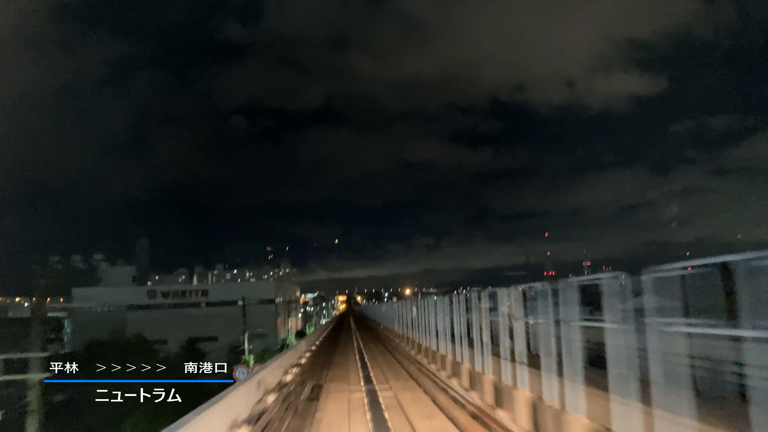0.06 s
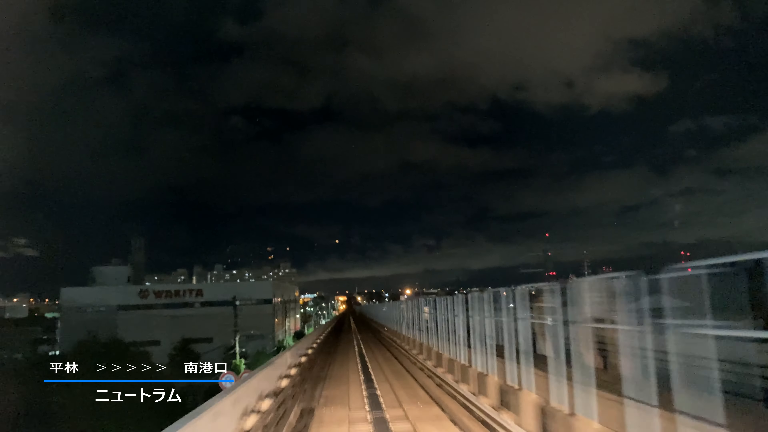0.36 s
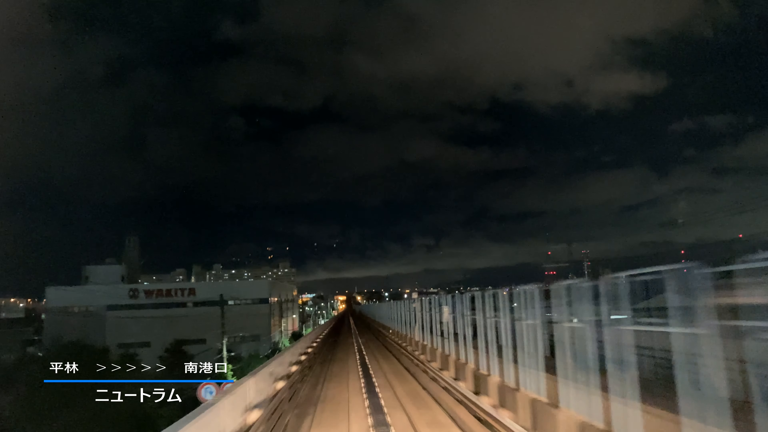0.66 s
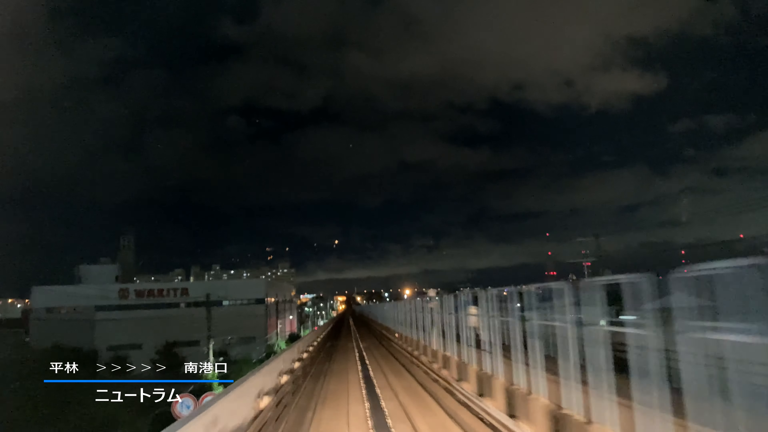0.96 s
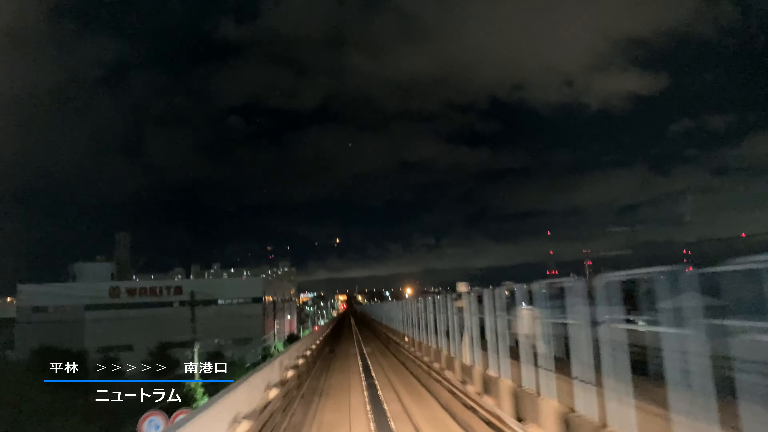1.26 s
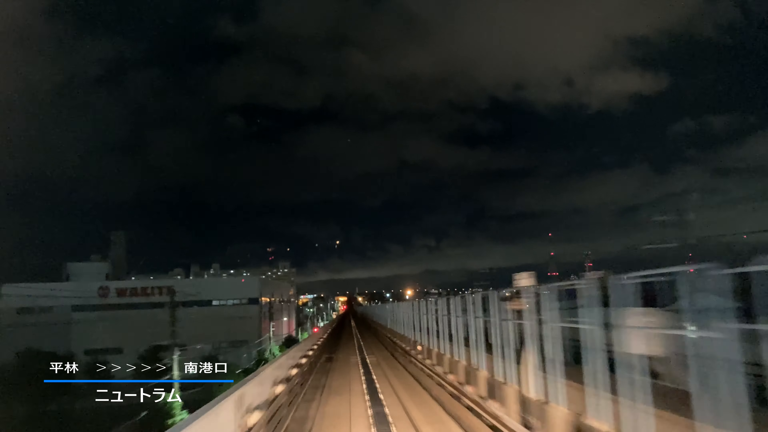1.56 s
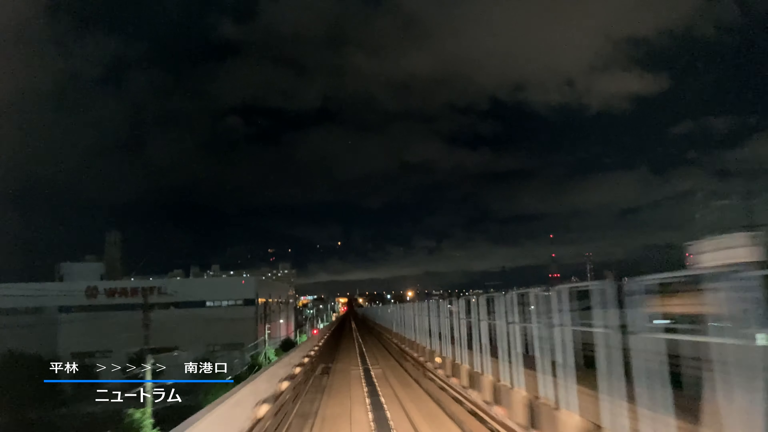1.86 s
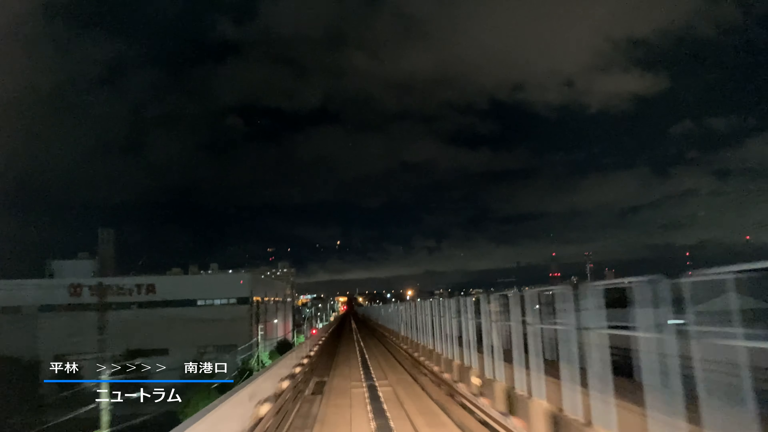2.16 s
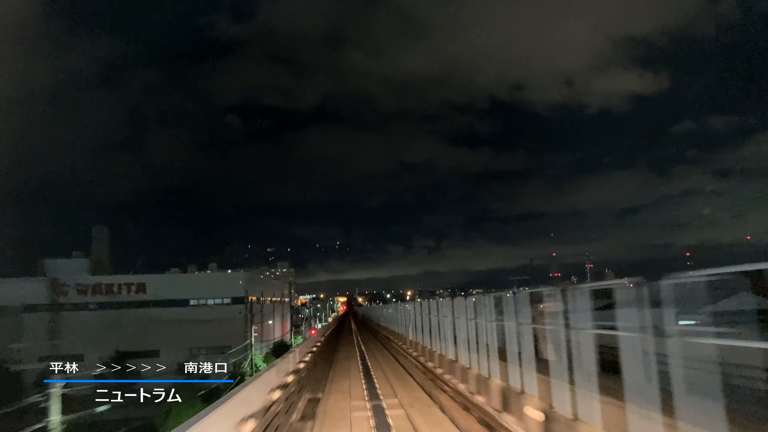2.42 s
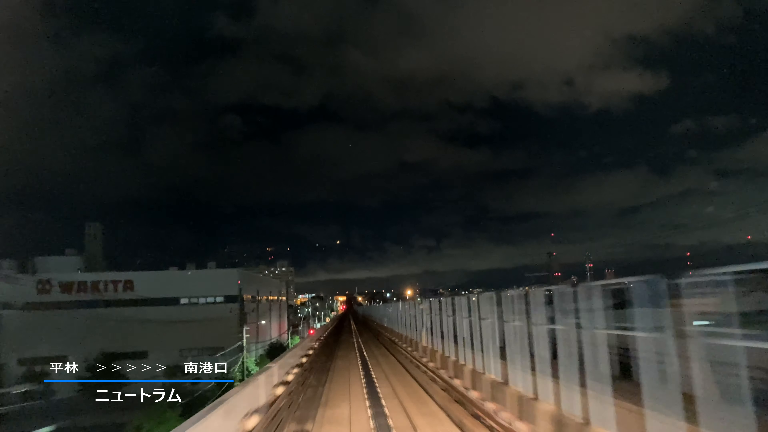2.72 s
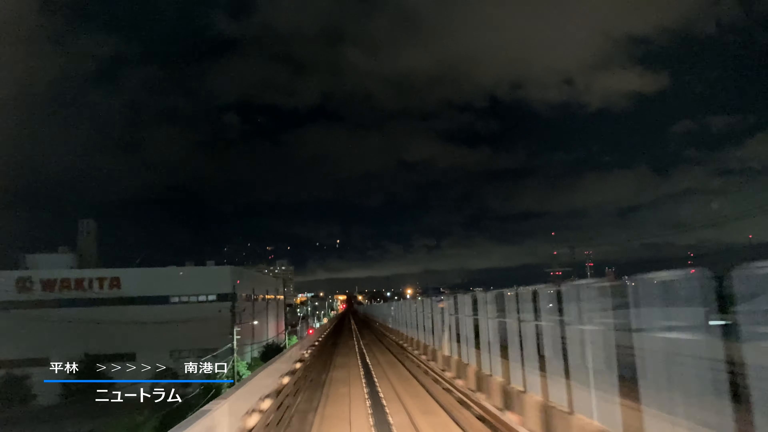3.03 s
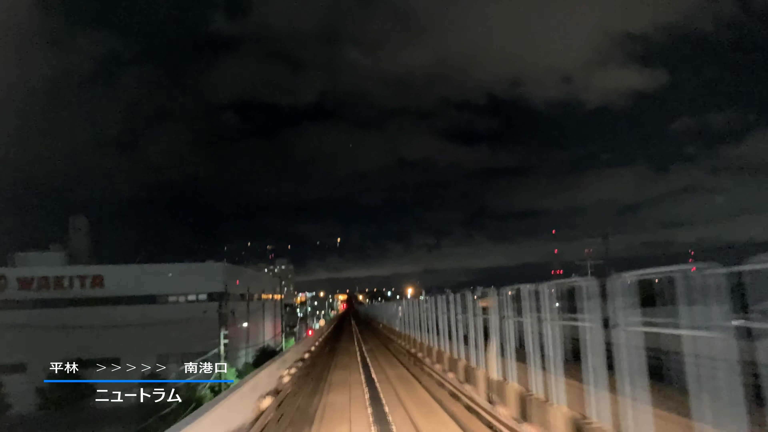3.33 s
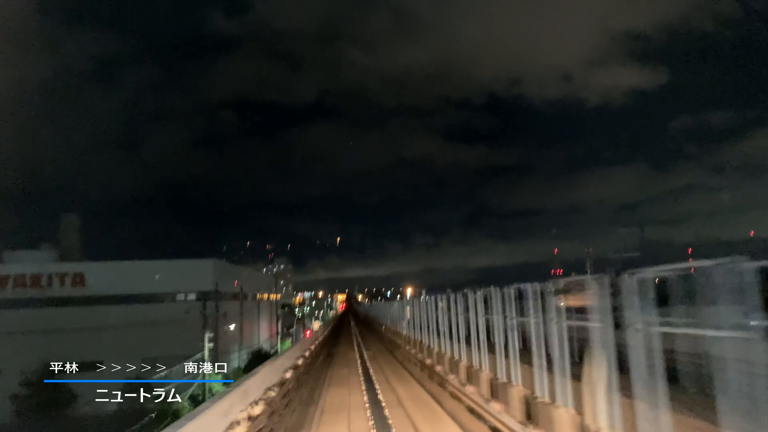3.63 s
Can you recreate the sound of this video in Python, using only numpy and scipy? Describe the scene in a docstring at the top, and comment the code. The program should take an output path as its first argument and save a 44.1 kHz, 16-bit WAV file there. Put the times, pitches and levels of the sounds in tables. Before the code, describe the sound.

A tram rumbles along an elevated track, heard from inside, with soft thuds over joints, rushing air, brief scraping and ticking fittings.

```python
"""A rubber-tyred tram runs along a raised concrete track, heard from inside the front of the car.
The tyres shake the body, set the cabin air booming, roar on the concrete and thud over joints.
The drive hums thinly, air rushes past, and the shoes that collect power rub on their rail in spells.
Loose fittings rattle and tick as the car is jolted, and now and then there is a faint, high squeak."""
import sys
import numpy as np
from scipy import signal
from scipy.fft import rfft, irfft, next_fast_len
from scipy.io import wavfile
from scipy.ndimage import uniform_filter1d

SR = 44100
rng = np.random.default_rng(int(sys.argv[2]) if len(sys.argv) > 2 else 0)


def to_wav(sig):
    """Store sig (one row per channel, or 1-D mono) as 16-bit WAV at the path in sys.argv[1].

    Samples outside -1..1 are clipped; the rate is SR.
    """
    pcm = np.clip(np.atleast_2d(sig), -1, 1) * 32767
    pcm = np.round(pcm).astype(np.int16)
    wavfile.write(sys.argv[1], SR, pcm.T)  # frames by channels


N = 351477
FFT_SIZE = next_fast_len(N, real=True)
HZ = np.maximum(np.arange(FFT_SIZE // 2 + 1) * SR / FFT_SIZE, 1)  # the frequencies in a spectrum

# How rough the track is. Each row: time in seconds, roughness in dB above ordinary concrete.
ROUGHNESS = [(0, 8), (.5, 1.5), (.65, 2), (1.1, 2), (1.35, 3.5), (1.7, 4), (1.9, -0.5), (2.1, -1),
             (2.7, -1.5), (3.4, -2.5), (3.57, 3.5), (3.98, 1.5), (4.3, 1.5), (4.9, -2), (5.55, -0.5),
             (5.8, 2.5), (6.8, -1.5), (7.55, 0), (7.85, 4)]
# How sounds follow it. Each pair: level in dB on ordinary concrete, dB added per dB of roughness.
BOOM_LAW, BODY_LAW, SWAY_LAW, ROAR_LAW = (-22.5, 1.0), (-20, 0.69), (-21.5, 0.14), (-24.5, 0.25)
SCRAPE_LAW, SIZZLE_LAW, RATTLE_LAW = (-50, 0.8), (-62, 1.8), (-59, 0.93)

# Uneven patches: long waves in the concrete make the air boom, short ones shake the body.
# Each row: start in seconds, length in seconds, boom in dB, body shake in dB.
BUMPS = [(0.0, 0.046, -9, -15), (0.145, 0.21, -11.5, -29), (.46, .07, -20.5, -21),
         (0.723, 0.13, -11.5, -35), (0.964, 0.071, -29, -15.5), (1.047, 0.15, -12.5, -53),
         (1.267, 0.052, -31, -13.5), (1.347, 0.19, -11, -39), (1.579, .05, -17.5, -17),
         (2.725, 0.17, -23, -40), (3.088, .2, -24, -45), (3.45, 0.15, -10.5, -35), (3.554, 0.088, -18, -13),
         (3.69, 0.08, -13.5, -21), (3.8, .05, -31.5, -15), (3.88, 0.11, -13, -22),
         (4.052, 0.045, -15.5, -25), (4.193, .16, -23.5, -25), (4.604, 0.2, -15, -47),
         (5.018, 0.15, -30.5, -17.5), (5.258, 0.28, -18, -29), (5.574, 0.13, -13, -25),
         (5.733, 0.22, -12, -20), (6.11, .2, -15.5, -24), (6.362, 0.035, -23, -13),
         (6.695, 0.11, -37, -17.5), (6.941, 0.31, -20, -22.5), (7.162, 0.045, -22.5, -15.5),
         (7.66, .04, -12, -28), (7.797, 0.11, -15.5, -22)]
# The car lurches on its springs. Each row: start in seconds, level in dB.
LURCHES = [(.1, -20), (1.86, -18.5), (3.29, -16), (3.65, -15), (3.95, -16.5), (6.21, -20.5)]
# How loud the drive hums. Each row: time in seconds, level in dB.
HUM_LEVEL = [(0, -42.5), (.4, -38.5), (1.7, -40.5), (2.6, -52), (3.3, -52.5), (3.5, -37.5), (4, -52.5),
             (5.2, -40.5), (6.3, -47), (7, -39.5), (7.97, -38.5)]
# The tones in that hum. Each row: pitch in Hz, dB added to the hum's level.
HUM_TONES = [(452, 2), (1143, -21.5)]
# A shoe presses on the rail. Each row: start and length in seconds, scrape and sizzle in relative dB.
RUBS = [(0.0, 0.26, -48, -56), (0.305, 0.23, -51.5, -52), (0.94, 0.06, -40.5, -46),
        (1.198, 0.034, -49, -46), (1.298, 0.042, -39.5, -45), (1.424, 0.14, -46, -62),
        (3.517, .07, -49, -60), (3.584, 0.11, -37.5, -45.5), (3.69, 0.1, -42.5, -45.5),
        (3.9, 0.043, -37.5, -45), (3.935, 0.1, -43.5, -44.5), (4.115, 0.026, -42, -38),
        (4.224, 0.18, -52, -55.5), (4.8, 0.076, -43, -60), (5.252, 0.13, -42.5, -69), (6.18, .08, -51, -54),
        (7.684, 0.16, -43, -68)]
# Loose fittings tick. Each row: start in seconds, ring in relative dB, crack in dB.
TICKS = [(0.0971, -42, -39), (0.2408, -37.5, -41), (0.248, -38, -41), (0.36, -42, -49), (0.966, -52, -40),
         (1.2859, -40, -48), (1.4835, -32.5, -38), (1.4984, -40, -47), (1.7776, -37.5, -46),
         (2.9232, -40, -49), (3.1166, -49, -52), (3.3492, -39, -50), (3.4599, -36, -45), (3.6117, -40, -44),
         (3.652, -37, -41), (3.659, -34, -38), (3.693, -39, -42), (3.9025, -44, -46), (3.917, -28.5, -37.5),
         (3.944, -42, -42), (4.028, -34, -44), (4.13, -42, -39), (5.663, -38, -43), (5.696, -41, -44),
         (7.209, -36.5, -43), (7.658, -37, -44), (7.728, -43, -48), (7.7413, -31, -37), (7.749, -40, -46),
         (7.7688, -42, -48), (7.926, -33, -39)]
# The tyres cross joints in the track. Each row: start in seconds, thud in dB, knock in dB.
JOINTS = [(0.292, -47, -28.5), (1.26, -26, -27), (1.329, -26, -23), (1.397, -33, -25), (1.659, -24.5, -29),
          (2.04, -27, -38), (2.83, -41, -28), (3.219, -24.5, -22), (3.552, -22.5, -21), (3.677, -22.5, -34),
          (3.79, -33, -27), (3.915, -23, -23), (4.131, -21, -33), (4.42, -27, -29), (4.475, -25.5, -33),
          (5.07, -40, -36.5), (5.64, -27.5, -42), (5.698, -25.5, -30.5), (5.78, -22, -43),
          (5.849, -31.5, -28.5), (5.999, -23.5, -39), (6.121, -24, -27.5), (6.4, -26, -30),
          (6.584, -26.5, -25.5), (7.829, -22, -32)]
# Faint, high squeaks. Each row: start in seconds, pitch in Hz, level in dB.
SQUEAKS = [(0.70, 7600, -63), (5.83, 7300, -63), (5.905, 7630, -62), (6.09, 7800, -61), (6.165, 7700, -62),
           (6.355, 7700, -64), (6.93, 8200, -61), (6.98, 8200, -51), (7.09, 7700, -56), (7.565, 8200, -56),
           (7.875, 7750, -63)]

# A colour says how strong a noise is from low to high. Each row: frequency in Hz, relative level in dB.
BODY_COLOUR = [(66, -6), (92, 3), (115, -0.5), (150, -4.5), (166, -8.5), (182, -17.5), (212, -13.5),
               (245, -19), (330, -27.5)]  # the shaking body
SWAY_COLOUR = [(15, -32), (28, -16), (35, -2.5), (39, -7), (45, 4), (53, -3), (62, 1), (70, 9), (78, 3),
               (86, -26.5)]  # the rocking car
ROAR_COLOUR = [(140, -1.5), (165, 3.5), (182, -2), (207, 6), (235, 0), (265, 0.5), (370, -4), (500, -7),
               (720, -5.5), (950, -11), (1100, -8.5), (1200, -14), (1400, -14), (1650, -19), (2300, -62.5),
               (4000, -66.5)]  # tread on concrete
AIR_COLOUR = [(1100, -19), (1700, -3.5), (2100, 3), (2500, -10.5), (3300, -7), (3750, -10.5), (4200, -15),
              (5000, -14), (6000, -23), (7500, -25), (9800, -26.5), (12000, -35.5), (15500, -43.5)]  # rushing air
SCRAPE_COLOUR = [(900, -17.5), (1600, 7.5), (2200, 1.5), (3000, -5.5), (3750, -7), (4500, -14.5),
                 (6000, -18.5), (9000, -40)]  # a shoe's dull scrape
SIZZLE_COLOUR = [(2500, -20.5), (4400, 7.5), (6000, 0.5), (7700, -1), (9800, -2), (11500, -8.5),
                 (15500, -17.5)]  # a shoe's fine sizzle
RATTLE_COLOUR = [(2500, -2), (4500, 4), (6000, -6), (7800, -3.5), (11500, -13.5), (15500, -22.5)]  # small loose parts
CRACK_COLOUR = [(1400, -1), (2700, 4.5), (3800, 0.5), (4750, 1.5), (6200, -3), (7800, -4.5), (11500, -11),
                (15500, -22)]  # a plastic fitting's crack
THUD_COLOUR = [(230, -4.5), (290, 1.5), (340, 0.5), (365, -12.5), (410, -3.5), (500, -10.5)]  # the floor at a joint
KNOCK_COLOUR = [(450, -12), (570, 1), (740, -4.5), (850, -6.5), (1050, -6), (1200, -12), (1500, -16.5)]  # the walls at a joint

# Modes are where a part likes to ring. Each row: frequency in Hz, width in Hz, boost or cut in dB.
BODY_MODES = [(128.4, 5.6, 2.5), (139, 6.4, 3), (199, 30, 4.5)]  # the car body
PANEL_MODES = [(325, 17, 2.5), (374, 10, 2.5), (413.5, 33, 4.5), (539, 16, 6.5), (577, 9, 5.5),
               (744, 8, -8), (800, 12, 2), (832, 39, 5), (923.4, 30, 8), (960, 12, 8), (991, 12, 1.5),
               (1031, 8.4, 6)]  # floor and wall panels
TRIM_MODES = [(2385, 22, 9.5), (2660, 27, 6.5), (2820, 35, 2), (2930, 16, 12.5), (3150, 14, 5.5),
              (3350, 18, 7), (4150, 200, 8), (6470, 350, 7.5), (7650, 500, 1), (10800, 2700, 9)]  # cabin trim in the rushing air
FITTING_MODES = [(2900, 430, -3.5), (3500, 300, -3), (4280, 290, -4.5), (4720, 380, -4.5), (5300, 300, -16)]  # loose fittings
KNOCK_MODES = [(575, 57, 7.5), (670, 55, 7), (826, 35, 6)]  # knocked walls

# The microphone's left and right openings, or ports. Each row: frequency in Hz, how alike they sound
# from 0 to 1, how far the left is ahead in radians, how much louder the left is in dB.
PORTS = [(80, .999, .42, -1), (130, .996, .36, -.7), (220, .98, .15, 0), (290, .96, .35, 0),
         (430, .91, -.1, 1), (590, .74, 1, 0), (740, .52, .9, -.5), (1000, .72, .65, -.5),
         (1380, .5, .6, -1.5), (1580, .66, 3.95, -.5), (2050, .85, 3.75, -3), (2350, .55, 3.6, -3),
         (2600, .65, 7.05, -1.5), (3350, .55, 7.1, -1.5), (3950, .42, 10.1, 1), (4800, .35, 13.2, .5),
         (6000, .2, 15.4, -.5), (7200, .45, 18.4, -1), (11500, .7, 31, 0), (15500, .6, 38, 0)]
# Dips in the microphone's treble. Each row: frequency in Hz, width in Hz, level change in dB.
MIC_DIPS = [(9260, 760, -28), (13550, 500, -12.5)]


def from_db(db):
    """Turn decibels into a gain to multiply by."""
    return 10 ** (np.asarray(db) / 20)


def rms_one(x):
    """Scale a signal so that its average level (rms) is 1."""
    return x / np.sqrt(np.mean(x ** 2) + 1e-20)


def in_time(rows):
    """Join a table's rows with straight lines, giving each column a value at every sample."""
    times, *columns = np.transpose(rows)
    return [np.interp(np.arange(N) / SR, times, column) for column in columns]


def in_frequency(rows):
    """Join a table's rows, giving each column a value at every frequency."""
    hz, *columns = np.transpose(rows)
    return [np.interp(np.log(HZ), np.log(hz), column) for column in columns]


def peak(hz, width_hz):
    """The power curve of one resonance: 1 at its centre, falling away on both sides."""
    return 1 / (1 + ((HZ ** 2 - hz ** 2) / (HZ * width_hz)) ** 2)


def colour(points, modes=()):
    """Gain at each frequency: a smooth curve with modes added, falling steeply past its ends."""
    low_hz, high_hz = points[0][0], points[-1][0]
    edges = np.minimum(np.minimum(HZ / low_hz, high_hz / HZ), 1) ** 6
    modes_db = sum(db * peak(hz, width) for hz, width, db in modes)
    return edges * from_db(in_frequency(points)[0] + modes_db)


def white():
    """The spectrum of a fresh white noise."""
    return rfft(rng.standard_normal(FFT_SIZE))


def to_sound(spectrum):
    """Turn a spectrum into samples."""
    return irfft(spectrum, FFT_SIZE)[..., :N]


def drift(rate_hz):
    """A smooth random wobble of about 1 either way; a higher rate makes it quicker."""
    return rms_one(to_sound(white() / (1 + (HZ / rate_hz) ** 2)))


def throb(low_hz=5, high_hz=14):
    """Uneven pulsing of about 1 either way, by default at the rate of the bouncing wheels."""
    return rms_one(to_sound(white() * colour([(low_hz, 0), (high_hz, 0)])))


def at_ports(direct, diffuse):
    """Two spectra to stereo: sound reaches the ports out of step, and partly unrelated."""
    alike, lead, balance_db = in_frequency(PORTS)
    alike, tilt = np.clip(alike, 0, 1), from_db(balance_db / 2)
    right = alike * np.exp(-1j * lead) * direct + np.sqrt(1 - alike ** 2) * diffuse
    return to_sound(np.array([direct * tilt, right / tilt]))


def tone_at_ports(tone):
    """A mono tone as the two ports hear it."""
    spectrum = rfft(tone, FFT_SIZE)
    return at_ports(spectrum, 1j * spectrum)


def noise(gain):
    """Stereo noise of a given colour, at level 1."""
    return rms_one(at_ports(white() * gain, white() * gain))


def evened(x, span_s):
    """Smooth away a noise's own swells that last longer than span_s."""
    power = uniform_filter1d(np.mean(x ** 2, axis=0), int(span_s * SR))
    power = uniform_filter1d(power, int(span_s * SR / 2))
    return rms_one(x / np.sqrt(power + 1e-9))


def swell(start_s, t60, rise_s, hold_s=0):
    """The loudness shape of a push: it rises, holds, then fades by 60 dB in t60 seconds."""
    start, shape = int(start_s * SR), np.zeros(N)
    age = np.arange(min(SR, N - start)) / SR
    fade = from_db(-60 * np.maximum(age - hold_s, 0) / t60)
    shape[start:start + len(age)] = fade * (1 - np.exp(-age / rise_s))
    return shape


def ride_gain(law, rough_db, events=()):
    """A sound's gain: it follows the track's roughness, and single events add their power."""
    level_db, slope = law
    return np.sqrt(from_db(level_db + slope * rough_db) ** 2 + sum(event ** 2 for event in events))


def wandering_tone(hz, wander_hz, rate_hz):
    """A pure tone at level 1 whose pitch strays a little."""
    return np.sqrt(2) * np.sin(2 * np.pi * np.cumsum(hz + wander_hz * drift(rate_hz)) / SR)


def patchy(x, low_hz, high_hz, depth_db, rate_hz, count=7):
    """Split a sound into frequency bands and let each one surge on its own."""
    spectrum, centres = rfft(x, FFT_SIZE), np.log(np.geomspace(low_hz, high_hz, count))
    bands = (to_sound(spectrum * np.interp(np.log(HZ), centres, share)) for share in np.eye(count))
    return sum(band * from_db(depth_db * drift(rate_hz)) for band in bands)


def rumble(rough_db, boom_hz=84.66, boom_throb_db=-0.5, body_throb_db=3.0):
    """Rough concrete shakes and rocks the car; long bumps make the cabin air boom on one low note."""
    drone = evened(noise(peak(boom_hz, width_hz=6) * colour([(60, 0), (120, 0.008)])), span_s=0.35)
    body = evened(noise(colour(BODY_COLOUR, BODY_MODES)), span_s=0.12)
    sway = evened(noise(colour(SWAY_COLOUR)), span_s=0.17)
    boom_power, shakes = 0, []
    for start, length, boom_db, body_db in BUMPS:
        push = swell(start, t60=0.37, rise_s=0.013, hold_s=length)
        boom_power += (from_db(boom_db) * push) ** 2
        shakes.append(from_db(body_db) * push)
    lurches = [from_db(db) * swell(start, t60=0.54, rise_s=0.084, hold_s=0.15) for start, db in LURCHES]
    pressure = np.sqrt(boom_power) * from_db(boom_throb_db * throb())
    boom = tone_at_ports(pressure * wandering_tone(boom_hz, wander_hz=1.958, rate_hz=5.7))
    drone *= ride_gain(BOOM_LAW, rough_db)
    body *= ride_gain(BODY_LAW, rough_db + body_throb_db * throb(), shakes)
    sway *= ride_gain(SWAY_LAW, rough_db, lurches)
    return boom + drone + body + sway


def tyre_roar(rough_db, flutter_db=0.65):
    """Tread noise comes through the floor and wall panels, fluttering and surging."""
    flutter = from_db(flutter_db * drift(rate_hz=20))
    roar = noise(colour(ROAR_COLOUR, PANEL_MODES))
    roar = patchy(roar, low_hz=279, high_hz=1300, depth_db=1.4, rate_hz=12)
    return ride_gain(ROAR_LAW, rough_db) * flutter * evened(roar, span_s=0.27)


def rushing_air(level_db=-46):
    """Passing air hisses steadily and makes the cabin trim ring."""
    return from_db(level_db) * noise(colour(AIR_COLOUR, TRIM_MODES))


def drive_hum(waver_db=3.0):
    """The drive sings thin tones that waver in level and pitch."""
    hum_db, hum = in_time(HUM_LEVEL)[0], 0
    for hz, db in HUM_TONES:
        gain = from_db(hum_db + db + waver_db * drift(rate_hz=5.9))
        hum += gain * wandering_tone(hz, wander_hz=3.2, rate_hz=12)
    return tone_at_ports(hum)


def collector_shoes(rough_db, scrape_gain_db=3.0, sizzle_gain_db=-3, chatter_db=1.63, grit_db=0.3):
    """Sliding shoes make a dull scrape and a gritty sizzle; both swell when one presses on the rail."""
    scrapes, sizzles = [], []
    for start, length, scrape_db, sizzle_db in RUBS:
        press = swell(start, t60=0.37, rise_s=0.014, hold_s=length)
        scrapes.append(from_db(scrape_db) * press)
        sizzles.append(from_db(sizzle_db) * press)
    scrape = ride_gain(SCRAPE_LAW, rough_db, scrapes) * noise(colour(SCRAPE_COLOUR))
    sizzle = ride_gain(SIZZLE_LAW, rough_db, sizzles) * noise(colour(SIZZLE_COLOUR))
    chatter = from_db(chatter_db * throb(low_hz=6.8, high_hz=21.5))
    grit = from_db(grit_db * drift(rate_hz=300))
    return chatter * (from_db(scrape_gain_db) * scrape + from_db(sizzle_gain_db) * grit * sizzle)


def rattle(rough_db, taps_per_s=100, spread_db=0.5, t60=.07):
    """Small loose parts make tiny taps all the time, louder on rough concrete."""
    taps = rng.random(N) < taps_per_s / SR
    strengths = from_db(spread_db * np.minimum(rng.exponential(1, N), 3))
    decay = from_db(-60 / (t60 * SR)) ** 2  # share of a tap's power left after one sample
    power = signal.lfilter([1], [1, -decay], (taps * strengths) ** 2 + 1e-12)
    return ride_gain(RATTLE_LAW, rough_db) * rms_one(np.sqrt(power)) * noise(colour(RATTLE_COLOUR))


def fitting_ticks(ring_gain_db=1.0, echo_db=-17):
    """A jolted fitting rings briefly and gives a dry crack with a short cabin echo."""
    modes = sum(from_db(db) * peak(hz, width) for hz, width, db in FITTING_MODES)
    rings = cracks = 0
    for start, ring_db, crack_db in TICKS:
        rings += from_db(ring_db + ring_gain_db) * swell(start, t60=0.033, rise_s=.0003)
        echo = from_db(echo_db) * swell(start, t60=.2, rise_s=.003)
        cracks += from_db(crack_db) * (swell(start, t60=0.03, rise_s=.0003) + echo)
    ring_noise = evened(noise(modes), span_s=.005)
    crack_noise = evened(noise(colour(CRACK_COLOUR)), span_s=.004)
    return rings * ring_noise + cracks * crack_noise


def track_joints():
    """Rubber softens each joint to a thud in the floor and a hollow knock in the walls."""
    thuds = knocks = 0
    for start, thud_db, knock_db in JOINTS:
        thuds += from_db(thud_db) * swell(start, t60=0.32, rise_s=0.0087, hold_s=.01)
        knocks += from_db(knock_db) * swell(start, t60=0.21, rise_s=0.00093, hold_s=.01)
    floor = evened(noise(colour(THUD_COLOUR)), span_s=0.021)
    walls = evened(noise(colour(KNOCK_COLOUR, KNOCK_MODES)), span_s=0.012)
    return thuds * floor + knocks * walls


def squeaks(jitter_hz=210, upper_ratio=1.48, upper_db=-11):
    """Short, thin chirps: an unsteady high tone with a weaker one above it."""
    pitch_hz, _ = in_time(SQUEAKS)
    phase = 2 * np.pi * np.cumsum(pitch_hz + jitter_hz * drift(rate_hz=200)) / SR
    tone = np.sqrt(2) * (np.sin(phase) + from_db(upper_db) * np.sin(upper_ratio * phase))
    gain = sum(from_db(db) * swell(start, t60=.1, rise_s=.008, hold_s=0.017) for start, _, db in SQUEAKS)
    return tone_at_ports(gain * tone)


def scene():
    """Add up the wheels, air, drive, shoes and cabin noises."""
    rough_db = in_time(ROUGHNESS)[0]
    wheels = rumble(rough_db) + tyre_roar(rough_db) + track_joints()
    running = wheels + rushing_air() + drive_hum() + collector_shoes(rough_db)
    return running + fitting_ticks() + rattle(rough_db) + squeaks()


def record(dry, fade_s=0.0014, ceiling=.95, cutoff_hz=15700):
    """The microphone has two dips in the treble; the tallest peaks are rounded and the top is cut."""
    end_fades = np.minimum(np.minimum(np.arange(N), np.arange(N)[::-1]) / (fade_s * SR), 1)
    dips = from_db(sum(db * peak(hz, width) for hz, width, db in MIC_DIPS))
    heard = to_sound(rfft(dry * end_fades, FFT_SIZE) * dips)
    rounded = heard / (1 + (heard / ceiling) ** 8) ** (1 / 8)
    return signal.sosfilt(signal.ellip(10, .1, 80, cutoff_hz, fs=SR, output="sos"), rounded)


dry = scene()
out = record(dry)
to_wav(out)
```